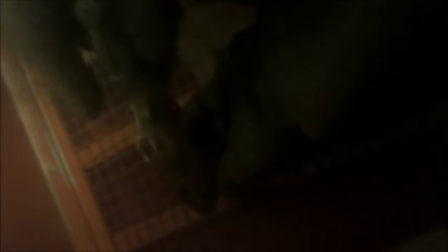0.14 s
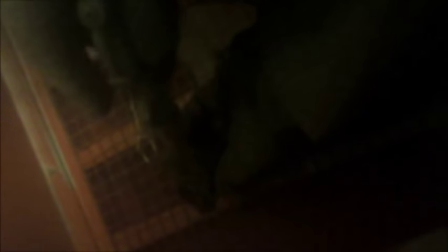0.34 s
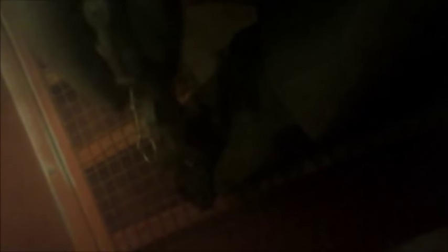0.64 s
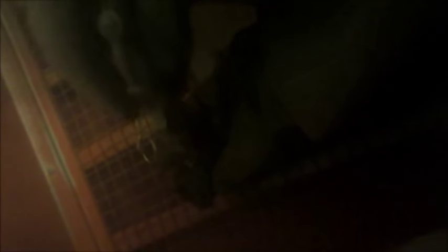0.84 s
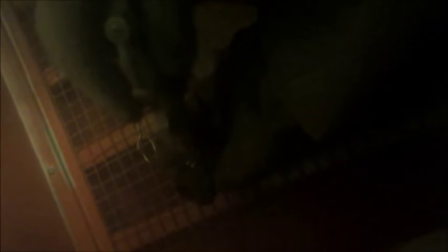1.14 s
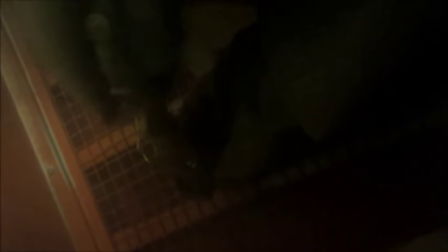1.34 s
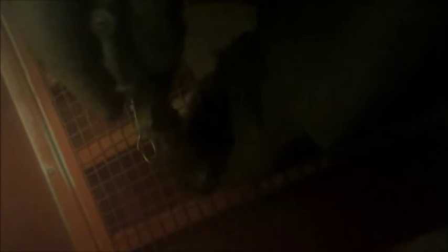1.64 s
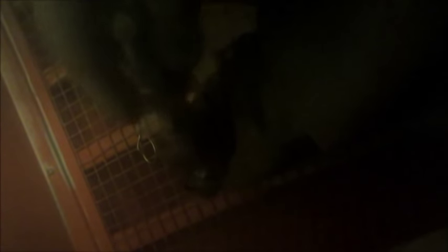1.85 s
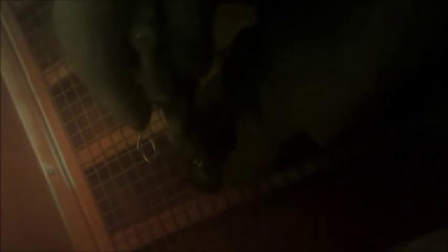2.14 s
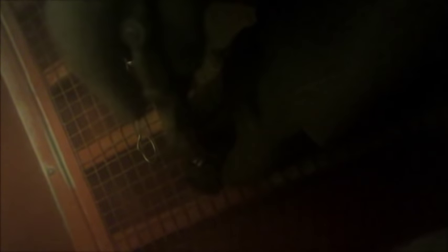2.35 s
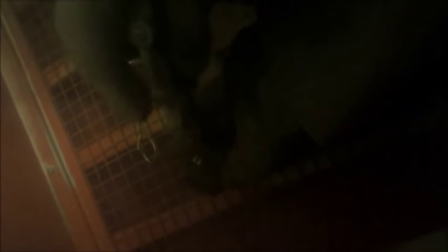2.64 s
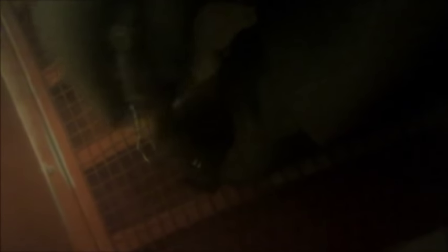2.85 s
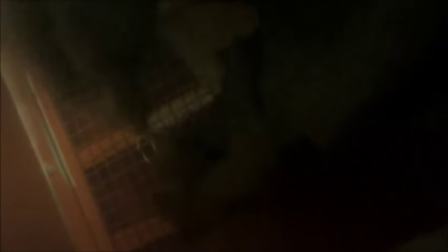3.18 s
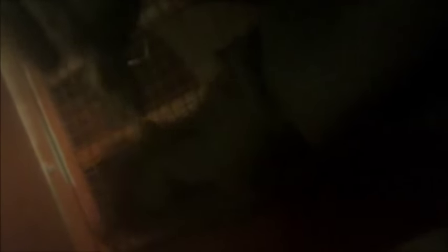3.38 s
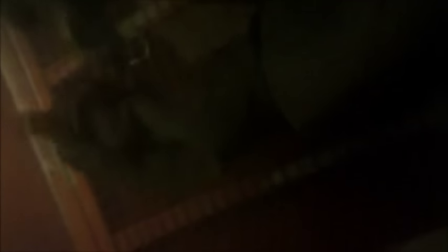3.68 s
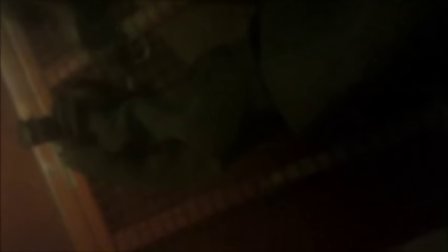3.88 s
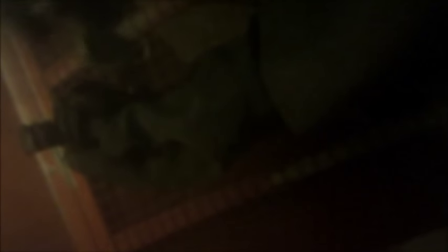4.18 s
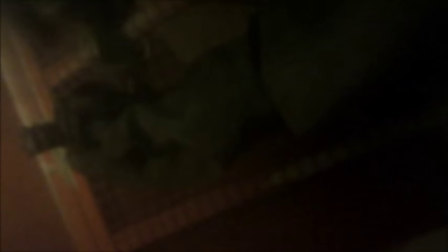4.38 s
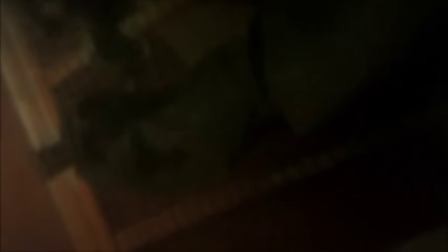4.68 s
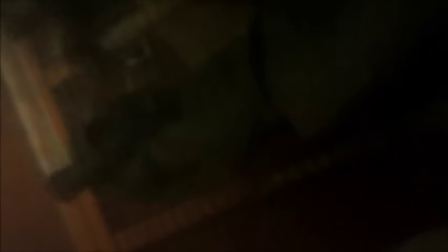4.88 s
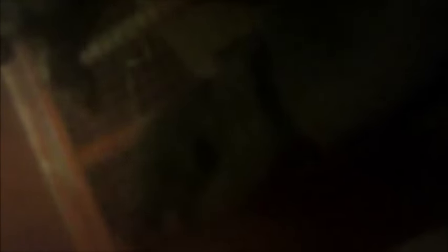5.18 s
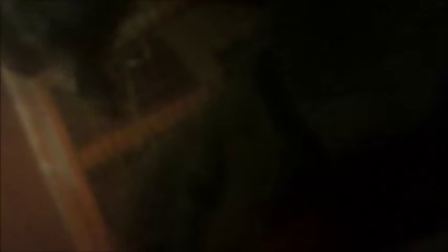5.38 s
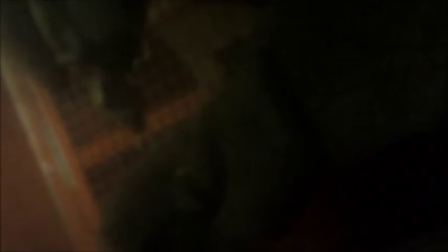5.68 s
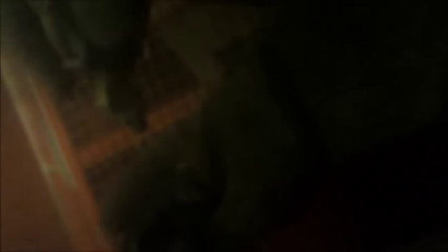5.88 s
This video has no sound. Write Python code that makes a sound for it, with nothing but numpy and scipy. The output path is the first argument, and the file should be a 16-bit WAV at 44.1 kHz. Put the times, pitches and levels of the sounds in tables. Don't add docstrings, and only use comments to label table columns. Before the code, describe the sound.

A blast gun fires three harsh, hissing jets in a resonant metal box, thumping on and off, with faint fan, hum and distant grinding between.

```python
import sys
import numpy as np
from scipy import signal
from scipy.fft import rfft, irfft
from scipy.io import wavfile

SR = 44100
rng = np.random.default_rng(int(sys.argv[2]) if len(sys.argv) > 2 else 0)


def gain_from_decibels(decibels):
    exponent = np.asarray(decibels, float) / 20
    return 10 ** exponent


def master(y):
    cut = np.clip(np.atleast_2d(y).T, -1, 1)
    pcm = np.round(cut * 32767)
    wavfile.write(sys.argv[1], SR, pcm.astype(np.int16))


N = 265658

# pitch_hz, level_db (per Hz)
FAN_COLOUR = [(20, -1.5), (60, 2.5), (150, 1), (300, -1.5), (600, -4.5), (1000, -5.5), (1600, -9),
              (2100, -17), (3000, -21), (4500, -23), (6500, -18.5), (10000, -19.5), (15000, -17)]
FAN_DB = -49.5
# pitch_hz, level_db
HUM_LINES = [(119.5, -66), (300, -66), (360, -59), (480, -65), (600, -71.5), (720, -64), (840, -68)]
# pitch_hz, width_hz, level_db
GRIND_MODES = [(976, 51, -3.5), (1214, 170, -1.5), (1463, 68, -0.5), (2320, 380, -8), (2880, 62, -15)]
# start_s, release_s, level_db, fade_db_per_s
GRIND_RUNS = [
    (.0, 2.0, -55, 135),
    (1.2, 1.58, -51.5, 25),
    (2.6, 3.1, -51, 38),
    (4.4, 5.4, -60, 39),
]
GRIND_RISE_DB_PER_S = 90
# start_s, end_s, pitch_hz, width_hz
STROKES = [(-.1, .46, 8120, 60), (3.24, 3.68, 740, 110), (3.35, 3.56, 170, 100), (5.33, 5.45, 1650, 50),
           (5.88, 6.15, 1670, 90), (5.86, 6.15, 870, 70), (4.9, 5.4, 150, 60), (-.05, .46, 1500, 80),
           (.1, .46, 980, 90), (1.76, 2.07, 1500, 60), (3.8, 4.45, 55, 50), (1.36, 1.62, 140, 120)]
STROKE_LEVELS = [-70, -54, -51, -54, -64, -64, -55, -59, -58, -61, -50.5, -49.5]
# start_s, level_db, panel_ring_db (relative to the thump)
THUMPS = [
    (0.3757, -27.5, 2),
    (1.35, -29.5, -1.5),
    (2.231, -33, -2),
    (2.845, -29, -0.5),
    (3.706, -35, -14),
    (4.688, -27, -7),
]
# pitch_hz, swell_s, direction (+1 outward, -1 inward)
PRESSURE_ARRIVES = (77, 0.014, 1)
# pitch_hz, swell_s, direction
PRESSURE_LEAVES = (75, 0.0096, -1)
# opens_s, shuts_s, ridge_hz, width_hz, ridge_db
VALVE = [
    (0.377, 1.349, 6340, 910, 1),
    (2.235, 2.844, 6560, 500, 1.5),
    (3.71, 4.696, 6360, 1000, -5),
]
# time_s, air_hiss_db, grit_strike_db (above the hiss)
JET_BURSTS = [
    [(.42, -18, 0.5), (.52, -22.5, 3.5), (.63, -20, -1), (.78, -21.5, 0), (.89, -19, -1), (1.0, -19, -1.5),
     (1.11, -20.5, -2.5), (1.17, -20.5, -4.5), (1.345, -19.5, -4.5)],
    [(2.28, -15.5, -3), (2.35, -19.5, 0), (2.46, -17, -5), (2.57, -20, -5), (2.63, -16.5, -6.5),
     (2.7, -17, -3.5), (2.76, -19.5, -6), (2.84, -18, -3.5)],
    [(3.74, -17.5, -1.5), (3.87, -17, -2), (4.11, -19.5, -4.5), (4.19, -18.5, -7), (4.24, -19.5, -4),
     (4.36, -18.5, -6.5), (4.53, -19.5, -2), (4.61, -17, -6.5), (4.68, -19, -1.5)],
]
# pitch_hz, level_db (per Hz)
JET_COLOUR = [(24, -59), (40, -31.5), (287, -10.5), (325, -6), (368, -6), (407, -6), (535, -18),
              (704, -4.5), (1380, -9.5), (1680, -4.5), (2710, -9), (4920, -8), (6480, -7.5), (13000, -14),
              (15500, -29)]
# pitch_hz, air_share, strike_share (shares of the swing in dB)
JET_FOLLOWS = [(600, 1.02, 1.08), (1300, 0.73, 1.02), (2500, 0.45, 0.6), (6000, 1.14, 0.059),
               (11600, 1.1, -0.41)]
# pitch_hz, fade_s
WORKSHOP_T60 = [(60, 1), (300, 0.69), (1000, 0.94), (2500, 0.93), (5000, 0.48), (7500, 0.52), (10500, 0.35),
                (15000, 0.2)]
# pitch_hz, width_hz, burst1_db, burst2_db,
# burst3_db
LOW_MODES = [(97, 80, -25, -6, -2.5), (200.8, 3.3, 10.5, 12, 11), (247.6, 6.1, -1, -3, 4.5),
             (332, 8.6, 14, 17, 14.5), (408, 9.1, 11.5, 11, 10.5), (500.4, 18, 14.5, 11.5, 13),
             (574.7, 7, 9, 7, 2.5), (623.5, 12.6, 16, 14, 11), (697.5, 17.7, 11.5, 9.5, 1),
             (735, 14, 10, 7.5, -3), (753, 14.4, 6, 3.5, 0), (820, 17, 9.5, 11.5, 10)]
# pitch_hz, width_hz, burst1_db, burst2_db, burst3_db
HIGH_MODES = [(931, 4.6, -23, -1, 0), (1000, 12, 7.5, 8.5, 3), (1104, 40, 5, 2.5, 0.5),
              (1210, 35, 7, -1, -30), (1316, 33, 0.5, 0.5, -4.5), (1680, 185, 1.5, 0, 2.5),
              (1835, 16, -18, 5, -4), (2090, 11, -5, 3, -20), (2277, 130, -11.5, -19, -2),
              (2377, 106, -2, 3.5, -23), (3018, 96, -8.5, -12, 3), (3296, 240, -3.5, -9, -3.5),
              (5405, 53, -8, 1, -18), (11200, 1630, -5, -9.5, -13)]
SPLIT_TIMES = [.724, 1.282, 1.677, 1.793, 1.979, 2.814, 3.14, 3.163, 3.325, 3.348, 3.372, 3.395, 3.813,
               4.068, 4.254, 4.881, 4.904, 5.206, 5.276, 5.972]
# lowest_hz, highest_hz
SPLIT_RANGE = (4200, 15400)
# narrowest_hz, widest_hz
SPLIT_WIDTH = (900, 2600)


def rms_one(x):
    return x / np.sqrt(np.mean(x ** 2) + 1e-20)


def clock():
    return np.arange(N) / SR


def at_hz(points, hz):
    table = np.array(points)
    return np.interp(np.log(hz), np.log(table[:, 0]), table[:, 1])


def drift(rate_hz):
    r = np.exp(-80 * np.pi * rate_hz / SR)
    white = rng.standard_normal(N // 40 + 2002)
    slow = signal.lfilter([1], [1, -2 * r, r * r], white)[2000:]
    return np.interp(np.arange(N) / 40, np.arange(len(slow)), rms_one(slow))


def resonance(x, hz, width_hz):
    r = np.exp(-np.pi * width_hz / SR)
    gain = (1 - r * r) / 2
    return signal.lfilter([gain, 0, -gain], [1, -2 * r * np.cos(2 * np.pi * hz / SR), r * r], x)


def bands(length):
    white = rng.standard_normal((2, length))
    edges = 22 * 2 ** np.arange(0, 9.7, 1 / 3)
    for k, (low, high) in enumerate(zip(edges, edges[1:])):
        band = signal.butter(2, [low, high], "band", fs=SR, output="sos")
        yield np.sqrt(low * high), signal.sosfilt(band, white[k % 2])


def burst_starts():
    return [0] + [int((row[0] - .05) * SR) for row in VALVE[1:]] + [N]


def background(early_hiss_db, early_rumble_db):
    early = clock() < VALVE[0][1]
    fan = 0
    for hz, noise in bands(N):
        lumps_db = 1.5 * drift(3) * (hz < 1500)
        early_db = early_hiss_db * (hz > 8500) + early_rumble_db * (hz < 200)
        fan = fan + gain_from_decibels(at_hz(FAN_COLOUR, hz) + lumps_db + early * early_db) * noise
    hum = 0
    for hz, db in HUM_LINES:
        waver = gain_from_decibels(db + 2.0 + 1.7 * drift(5))
        hum = hum + waver * np.sin(2 * np.pi * hz * clock() + rng.uniform(0, 2 * np.pi))
    return gain_from_decibels(FAN_DB - 1.5) * rms_one(fan) + hum


def grind_db(t):
    runs = []
    for start, stop, db, fade in GRIND_RUNS:
        rise_db = GRIND_RISE_DB_PER_S * np.maximum(start + 0.11 - t, 0)
        runs.append(db - rise_db - fade * np.maximum(t - stop, 0))
    return np.max(runs, axis=0)


def ringing_noise(x, hz, width_hz):
    return rms_one(resonance(resonance(x, hz, width_hz), hz, 2 * width_hz))


def far_tool():
    t, white = clock(), rng.standard_normal((2, N))
    grind = sum(gain_from_decibels(db) * ringing_noise(white[0], hz, width) for hz, width, db in GRIND_MODES)
    out = gain_from_decibels(grind_db(t) + 1.5 * drift(7.8)) * rms_one(grind)
    for (start, end, hz, width), db in zip(STROKES, STROKE_LEVELS):
        swell = np.clip(np.minimum(t - start, end - t) / .07, 0, 1)
        out += gain_from_decibels(db) * swell * ringing_noise(white[1], hz, width)
    return out


def dying_ring(age, hz, t60, start_db, rise_s):
    return gain_from_decibels(start_db - 60 * age / t60) * np.sin(2 * np.pi * hz * age) * np.minimum(age / rise_s, 1)


def thumps(ring_hz, ring_t60, ring_db, push_hz, push_db, panel_hz, panel_t60):
    out = np.zeros(N)
    swings = [PRESSURE_ARRIVES, PRESSURE_LEAVES] * len(VALVE)
    for (at, db, panel_db), (hz, swell_s, way) in zip(THUMPS, swings):
        age = np.maximum(clock() - at, 0)
        waves = np.sin(2 * np.pi * hz * age) + gain_from_decibels(push_db) * np.sin(2 * np.pi * push_hz * age)
        swing = age / swell_s * np.exp(1 - age / swell_s) * waves
        ring = dying_ring(age, ring_hz, ring_t60, ring_db, rise_s=0.021)
        panel = dying_ring(age, panel_hz, panel_t60, panel_db, rise_s=0.011)
        out += np.sign(way) * gain_from_decibels(db) * (swing + ring + panel)
    return out


def flow(rise_s, bleed_db_per_s):
    t, out = clock(), np.zeros(N)
    for opens, shuts, *_ in VALVE:
        rise = 1 - np.exp(-(np.maximum(t - opens, 0) / rise_s) ** 1.8)
        out += rise * gain_from_decibels(-bleed_db_per_s * np.maximum(t - shuts, 0))
    return out


def linger(power, t60):
    keep = gain_from_decibels(-120 / (t60 * SR))
    return signal.lfilter([1 - keep], [1, -keep], power + 1e-18)


def jet(surge_db, flicker_db, box_db, shop_db):
    times, air_db, strike_db = np.transpose(np.concatenate(JET_BURSTS))
    air_db = np.interp(clock(), times, air_db - air_db.mean())
    strike_db = np.interp(clock(), times, strike_db - strike_db.mean())
    follow_hz, air_shares, strike_shares = np.transpose(JET_FOLLOWS)
    pressure, surge = flow(rise_s=0.011, bleed_db_per_s=448), drift(35)
    near, tail = np.zeros(N), np.zeros(N)
    for hz, noise in bands(N):
        air = np.interp(np.log(hz), np.log(follow_hz), air_shares)
        strike = np.interp(np.log(hz), np.log(follow_hz), strike_shares)
        swing_db = air * air_db + strike * strike_db + surge_db * surge + flicker_db * drift(9.4)
        direct = (pressure * gain_from_decibels(swing_db)) ** 2
        t60, colour = at_hz(WORKSHOP_T60, hz), gain_from_decibels(at_hz(JET_COLOUR, hz))
        in_box = direct + gain_from_decibels(2 * box_db) * linger(direct, 0.46 * t60)
        near += colour * np.sqrt(in_box) * noise
        tail += colour * gain_from_decibels(shop_db) * np.sqrt(linger(direct, t60)) * noise[::-1]
    scale = gain_from_decibels(-22.5) / np.sqrt(np.mean(near ** 2))
    return scale * near, scale * tail


def nozzle(x):
    starts, ridges = burst_starts(), []
    for a, b, (_, _, hz, width, db) in zip(starts, starts[1:], VALVE):
        ridges.append(gain_from_decibels(db) * resonance(x[a:b], hz, width))
    return x + np.concatenate(ridges)


def cabinet(x, plain_db, modes):
    out, lengths = gain_from_decibels(plain_db) * x, np.diff(burst_starts())
    for k, (hz, width, *levels_db) in enumerate(modes):
        sign = (-1) ** k if hz < 900 else 1
        drive = np.repeat(gain_from_decibels(np.array(levels_db)), lengths)
        out = out + sign * drive * resonance(x, hz, width)
    return out


def reflections(x, t60, wet_db, steady):
    hop, length = int(.3 * SR), int(.3 * SR)
    age = np.arange(length) / SR
    dying = gain_from_decibels(-60 * age / t60) * np.minimum(age / .006, 1)
    treble = signal.sosfilt(signal.butter(2, 1100, "high", fs=SR, output="sos"), x)
    treble, wet = np.pad(treble, (hop, 2 * hop)), np.zeros(N + 3 * hop + length)
    share, lasting = np.clip(steady, 0, 1), rng.standard_normal(length)
    fade = np.sin(np.pi * np.arange(2 * hop) / (2 * hop))
    for a in range(0, N + hop, hop):
        fresh = rng.standard_normal(length)
        echoes = dying * (np.sqrt(share) * lasting + np.sqrt(1 - share) * fresh)
        echoes = echoes / np.sqrt(np.sum(echoes ** 2))
        wet[a:a + 2 * hop + length - 1] += signal.fftconvolve(treble[a:a + 2 * hop] * fade, echoes)
    return x + gain_from_decibels(wet_db) * wet[hop:hop + N]


def split_bands(x, side_db):
    side, frame = np.zeros(N), 2048
    hz = np.arange(frame // 2 + 1) * SR / frame
    window = signal.windows.kaiser_bessel_derived(frame, 4 * np.pi)
    lowest, highest = SPLIT_RANGE
    for centre, draws in zip(SPLIT_TIMES, rng.random((len(SPLIT_TIMES), 2, 2))):
        a = int(centre * SR) - frame // 2
        width_hz = np.interp(draws[:, 0], [0, 1], SPLIT_WIDTH)
        low_hz = lowest + draws[:, 1] * (highest - lowest - width_hz)
        chosen = ((hz > low_hz[:, None]) & (hz < (low_hz + width_hz)[:, None])).any(axis=0)
        piece = rfft(x[0, a - 300:a - 300 + frame])
        side[a:a + frame] += irfft(piece * chosen) * window
    return x + gain_from_decibels(side_db) * side * [[1], [-1]]


def scene():
    mono = background(early_hiss_db=-3.0, early_rumble_db=-5.5) + far_tool()
    mono = mono + thumps(ring_hz=57.7, ring_t60=0.77, ring_db=-9.5, push_hz=32.4, push_db=-4,
                         panel_hz=335.5, panel_t60=0.58)
    near, tail = jet(surge_db=0.64, flicker_db=0.92, box_db=-8.5, shop_db=-16)
    near = cabinet(nozzle(near), plain_db=-1.0, modes=LOW_MODES + HIGH_MODES)
    near = reflections(near, t60=.11, wet_db=-5.5, steady=.2)
    tail = cabinet(nozzle(tail), plain_db=4.0, modes=LOW_MODES)
    mono = mono + near + tail
    return np.array([mono, mono])


def low_pass(x):
    return signal.sosfilt(signal.butter(12, 16000, fs=SR, output="sos"), x)


def record(dry):
    rounded = 1.2 * np.tanh(dry / 1.2)
    top_cut = signal.ellip(14, .3, 80, 15040, fs=SR, output="sos")
    mix = split_bands(signal.sosfilt(top_cut, rounded), side_db=-6)
    return low_pass(mix)


dry = scene()
out = record(dry)
master(out)
```